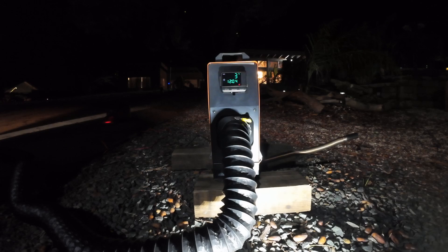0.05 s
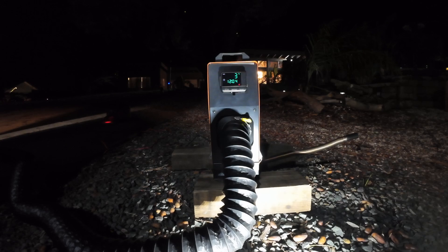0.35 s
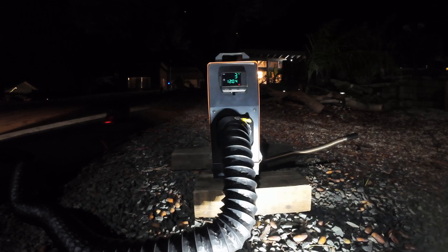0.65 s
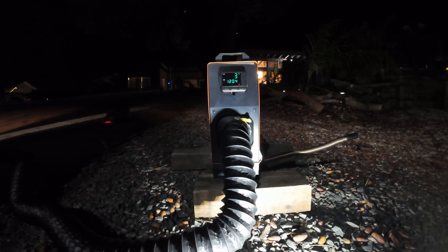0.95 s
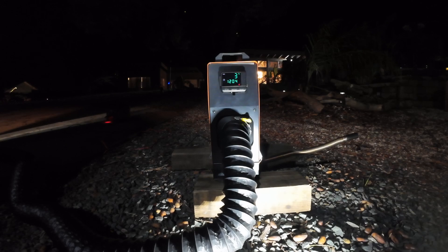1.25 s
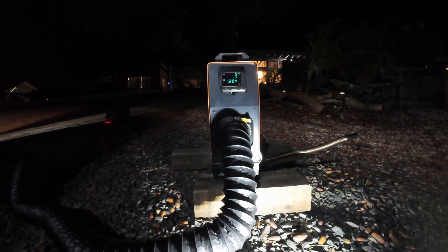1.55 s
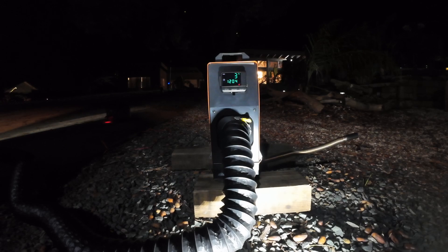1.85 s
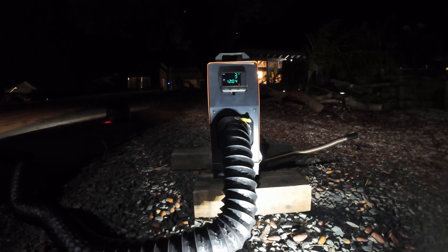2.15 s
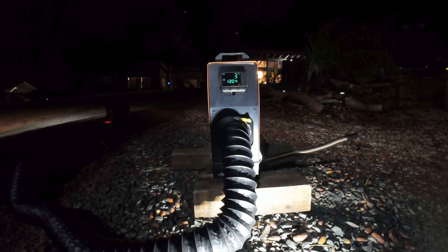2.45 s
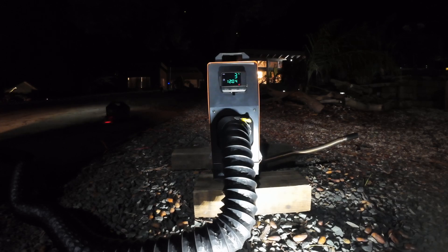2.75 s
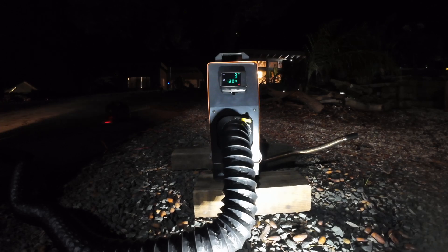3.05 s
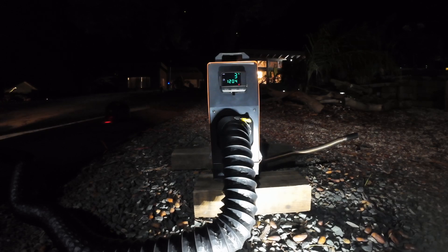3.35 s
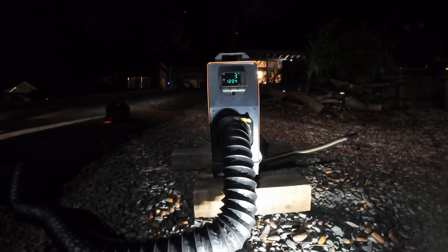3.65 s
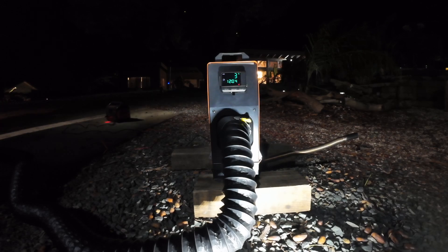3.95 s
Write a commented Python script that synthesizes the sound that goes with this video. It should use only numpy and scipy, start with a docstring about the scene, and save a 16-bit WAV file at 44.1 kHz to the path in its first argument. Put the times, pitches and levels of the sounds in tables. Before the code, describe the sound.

A diesel heater runs with a low roar, rushing air and steady fuel pump ticks.

```python
"""A low burner rumble under rushing air: a portable diesel heater runs outdoors, its hose close by.
The low roar rises and falls unevenly. The blower's air sings in the resonances of ribbed hose and
casing, over a breathy hum. A wandering whistle and faint blower tones stand in the roar,
and the fuel pump's plunger ticks at an even pace, a short metallic click on each stroke."""
import sys
import numpy as np
from scipy import signal
from scipy.fft import rfft, irfft, next_fast_len
from scipy.io import wavfile
from scipy.ndimage import uniform_filter1d, map_coordinates

SR = 44100
rng = np.random.default_rng(int(sys.argv[2]) if len(sys.argv) > 2 else 0)


def int16_out(signal):
    """Quantize to a 16-bit WAV file."""
    q = np.round(np.clip(np.atleast_2d(signal).T, -1, 1) * 32767)
    wavfile.write(sys.argv[1], SR, q.astype(np.int16))


N = 176400

# colour of the burner's roar: f/Hz, level/dB per Hz
ROAR_SPECTRUM = [(10, -71), (20, -54.5), (40, -53), (60, -53), (100, -47.5), (140, -48), (185, -55),
                 (220, -53.5), (260, -57.5), (300, -68), (600, -82), (3500, -150)]
# level of the low roar: t/s, gain/dB
ROAR_LEVEL = [(0, -1.5), (.09, 2.7), (.32, -2), (.63, 1), (.76, -.3), (.93, 1.5), (1.05, 0.5), (1.55, 0),
              (1.8, -1.5), (1.95, .2), (2.17, 2.8), (2.32, -1), (2.42, 3), (2.6, -3), (2.73, 1.2),
              (2.94, -1.5), (3.15, 1.5), (3.42, 1.3), (3.5, -1.5), (4, 1)]
# colour of the rushing air: f/Hz, level/dB per Hz
RUSH_SPECTRUM = [(100, -71.5), (350, -66), (700, -66.5), (900, -71), (1080, -72), (1260, -67.5),
                 (1480, -64), (1750, -73), (2170, -71.5), (2550, -84.5), (2850, -78.5), (3080, -82.5),
                 (4250, -83), (4780, -84.5), (4970, -90), (5250, -90), (5800, -95.5), (6800, -93.5),
                 (7100, -104), (8500, -106), (10300, -107), (11500, -110), (13200, -105.5), (13700, -113),
                 (14200, -145)]
# resonances of hose and casing: f/Hz, width/Hz, level/dB per Hz
HOSE_MODES = [(511, 35, -63), (767, 37, -62), (1179, 52, -62), (1369, 62, -55), (1588.6, 58.6, -56),
              (1979, 53, -62), (3248, 37, -73.5), (3606, 127, -69.5), (4044, 68, -78), (6460, 130, -93),
              (7830, 350, -100), (9020, 240, -103)]
# the hose's two lowest resonances, its hum: f/Hz, width/Hz, level/dB per Hz
HUM_MODES = [(370.6, 42.6, -52.5), (440, 33, -55.5)]
# swell and ebb of the hum: t/s, gain/dB
HUM_SWELLS = [(0, 3), (.3, -2.5), (.39, 2.5), (.48, 1), (.9, 1.5), (1.05, -6), (1.2, 0.2), (1.41, 2),
              (1.65, -3), (1.74, 3.5), (1.83, -4.5), (2.16, 1.5), (2.61, -2), (2.76, 1.5), (3.18, 1.5),
              (3.27, -4), (3.36, 0.5), (4, -1.5)]
# path of the blower's whistle: t/s, f/Hz, rms level/dB
WHISTLE_PATH = [(0, 2359, -33), (.45, 2355, -34.5), (.7, 2373, -34), (1.25, 2365, -35.5), (1.85, 2341, -34),
                (2.35, 2356, -33), (2.8, 2358, -34.5), (3.2, 2359, -35), (4, 2375, -33.5)]
# contacts in a pump stroke (valve, plunger on its stop, rebound): t/s from the stroke, level/dB, t60/s
STROKE_CONTACTS = [(-.0007, -9, 0.0038), (0, 1, 0.0044), (.001, -6, 0.041)]
# colour of the pump's tick: f/Hz, relative level/dB
TICK_COLOUR = [(300, -20), (1000, 4), (2600, 3), (3200, -4), (4100, 1), (4950, -8), (5500, -2.5),
               (6600, -11), (7050, -3.5), (7400, -14.5), (8100, -9), (8800, -20.5), (11000, -17),
               (11900, -14.5), (12400, -21), (13100, -13), (14000, -25), (15200, -39)]
# tones of the blower: f/Hz, rms level/dB
BLOWER_TONES = [(598, -52.5), (968, -58.5), (1567, -53), (2394, -49)]
# stereo width of the burner and air noises: f/Hz, side over mid/dB
NOISE_SPREAD = [(25, -19), (65, -26.5), (125, -41.5), (210, -38.5), (290, -25.5), (560, -26), (800, -18),
                (1400, -23), (2150, -13), (2360, -27), (2550, -14), (2950, -16), (4200, -18), (4750, -8),
                (5400, -13), (6600, -4), (7400, -14), (9200, -4), (13000, -5)]
# stereo width of the tick: f/Hz, side over mid/dB
TICK_SPREAD = [(3000, -20), (5500, -13), (7500, -10), (9500, -3.5), (11800, -7), (13500, -3)]
# lean of the stereo image: f/Hz, left phase lead/rad, left minus right/dB
STEREO_LEAN = [(200, 0.024, 0), (1000, -.08, .1), (1300, -0.29, -0.5), (2150, -0.17, -.3),
               (2500, -0.71, .1), (2850, 0.019, -0.3), (3600, -0.38, .7), (4700, -0.081, 1.5),
               (5800, 0.06, -1.2), (6700, -.6, -1), (7200, 0, -.5)]


def burner():
    """The burner's low roar rises and falls unevenly."""
    level_db, = curves(ROAR_LEVEL)
    roar = evened(turbulence(lambda hz: amp(along(ROAR_SPECTRUM, hz))), span_s=0.33)
    return roar * amp(level_db)


def air_rush():
    """The blower drives a broad rush of turbulent air."""
    return turbulence(lambda hz: amp(along(RUSH_SPECTRUM, hz)))


def hose(waver_db=1.0, waver_hz=6.03):
    """The air stream sings in hose and casing, over a breathy hum that swells and ebbs."""
    swell_db, = curves(HUM_SWELLS)
    singing = resonant(HOSE_MODES) * amp(waver_db * wobble(waver_hz))
    hum = evened(resonant(HUM_MODES), span_s=.15) * amp(swell_db)
    return singing + hum


def whistle(width_hz=72):
    """The blower's breathy whistle: narrow noise whose pitch and strength wander."""
    hz, db = curves(WHISTLE_PATH)
    band = turbulence(lambda f: (1 + ((f - hz.mean()) / width_hz) ** 2) ** -1.5)
    steady = evened(signal.hilbert(band), span_s=0.18)
    glide = np.exp(2j * np.pi * np.cumsum(hz - hz.mean()) / SR)  # slides the band along the pitch path
    return amp(db) * unit(np.real(steady * glide))


def fuel_pump(first_s=.1228, period_s=.215463, gain_db=-26.5, scatter_db=0.4, fresh_share=0.3):
    """Each stroke of the plunger gives nearly the same short, dense metallic click."""
    lead, size = SR // 500, SR // 20  # each click spans 50 ms, from 2 ms before the stroke
    t = (np.arange(size) - lead) / SR
    power = sum((t >= s) * amp(db - 60 * np.maximum(t - s, 0) / t60) ** 2
                for s, db, t60 in STROKE_CONTACTS)
    ring = rng.standard_normal((2, size))  # the grain all strokes share
    ticks = np.zeros((2, N + SR))
    for stroke_s in np.arange(first_s, N / SR, period_s):
        grain = np.sqrt(1 - fresh_share) * ring + np.sqrt(fresh_share) * rng.standard_normal((2, size))
        click = unit(grain * np.sqrt(power)) * np.sqrt(power.mean())
        start = round(stroke_s * SR) - lead
        ticks[:, start:start + size] += amp(gain_db + scatter_db * rng.standard_normal()) * click
    mid, side = filtered(ticks, lambda hz: causal(unit(amp(along(TICK_COLOUR, hz)))))
    return stereo(mid, side, TICK_SPREAD)


def blower_tones(drift_share=0.00126, flutter_db=3.5):
    """Faint tones drift together with the motor's speed, each fluttering in level on its own."""
    motor_time = np.cumsum(1 + drift_share * wobble(5)) / SR
    return sum(amp(db) * unit(amp(flutter_db * wobble(12)) * np.sin(2 * np.pi * hz * motor_time))
               for hz, db in BLOWER_TONES)


def resonant(modes):
    """Turbulence sounding in steep-sided resonances."""
    def density(hz):
        return np.sqrt(sum(amp(db) ** 2 / (1 + ((hz - centre) / width) ** 2) ** 3
                           for centre, width, db in modes))
    return turbulence(density)


def turbulence(density):
    """Stereo noise with the given amplitude per root Hz, wider in the treble."""
    mid, side = filtered(rng.standard_normal((2, N)) * np.sqrt(SR / 2), density)
    return stereo(mid, side, NOISE_SPREAD)


def stereo(mid, side, spread):
    """Left and right, with the side shaped by a width table."""
    side = filtered(side, lambda hz: amp(along(spread, hz)))
    return np.array([mid + side, mid - side])


def evened(x, span_s):
    """Ride the gain so that x holds its level over spans of span_s."""
    power = np.mean(np.abs(x) ** 2, axis=0)
    size = int(span_s * SR)
    slow_power = np.abs(uniform_filter1d(uniform_filter1d(power, size), size))
    return x * np.sqrt(power.mean() / slow_power)


def amp(db):
    """Decibels to gain."""
    return 10 ** (np.asarray(db) / 20)


def unit(x):
    """Scale to rms 1."""
    return x / np.sqrt(np.mean(x ** 2) + 1e-20)


def along(points, hz):
    """Read (f/Hz, value) points on a log axis."""
    f, values = np.transpose(points)
    return np.interp(np.log(hz + 1), np.log(f + 1), values)


def curves(rows):
    """One automation curve for each column after the time."""
    times, *columns = np.transpose(rows)
    return [np.interp(np.arange(N) / SR, times, column) for column in columns]


def wobble(rate):
    """A smooth random curve, rate knots a second."""
    knots = rng.standard_normal(int(N * rate / SR) + 4)
    return map_coordinates(knots, [np.arange(N) * rate / SR])


def filtered(x, response):
    """Shape x with a frequency response."""
    size = next_fast_len(N + SR // 2)
    return irfft(rfft(x, size) * response(np.fft.rfftfreq(size, 1 / SR)), size)[..., :N]


def causal(gain):
    """The minimum-phase response with this gain: nothing rings ahead of the attack."""
    cepstrum = irfft(np.log(np.maximum(gain, 1e-6)))
    half = len(cepstrum) // 2
    cepstrum[1:half] *= 2
    cepstrum[half + 1:] = 0
    return np.exp(rfft(cepstrum))


def scene():
    """The whole heater, heard from in front."""
    return burner() + air_rush() + hose() + whistle() + blower_tones() + fuel_pump()


def record(dry, top_hz=15400):
    """Most of the sound reaches the right side slightly earlier; the very top is cut away."""
    lean = np.array(STEREO_LEAN)
    lead_rad, balance_db = lean[:, :2], lean[:, ::2]
    split = np.array([[.5], [-.5]])  # half to each side, in opposite directions
    pair = filtered(dry, lambda hz: np.exp(1j * split * along(lead_rad, hz))
                    * amp(split * along(balance_db, hz)))
    return filtered(pair, lambda hz: hz < top_hz)


dry = scene()
out = record(dry)
int16_out(out)
```